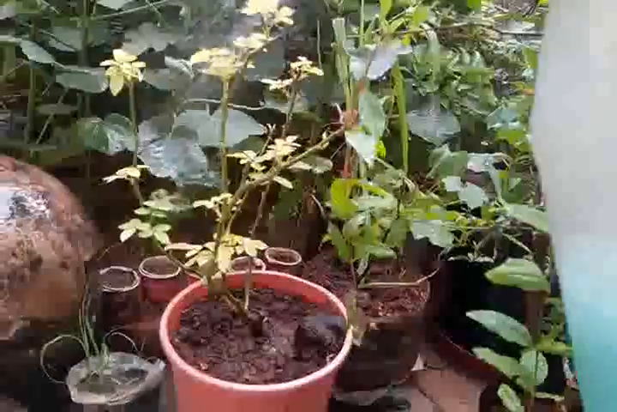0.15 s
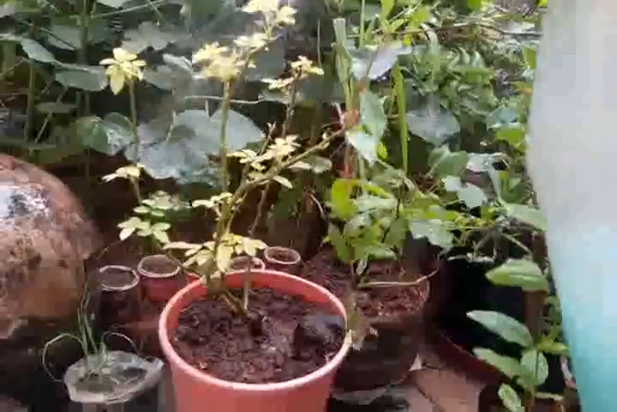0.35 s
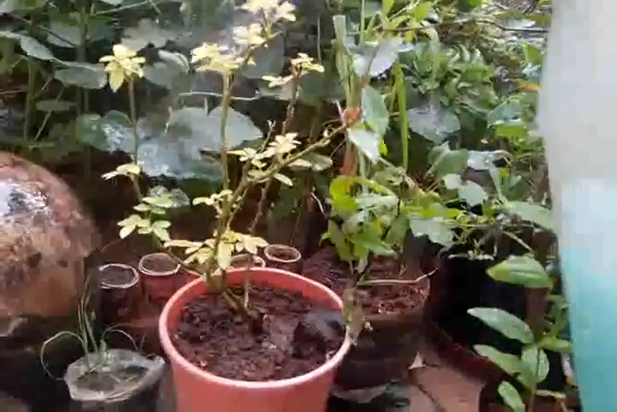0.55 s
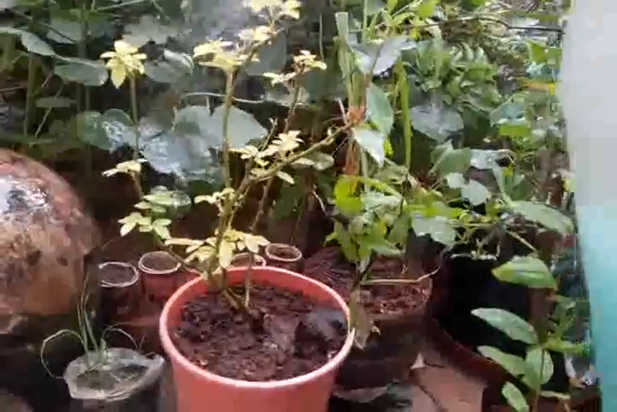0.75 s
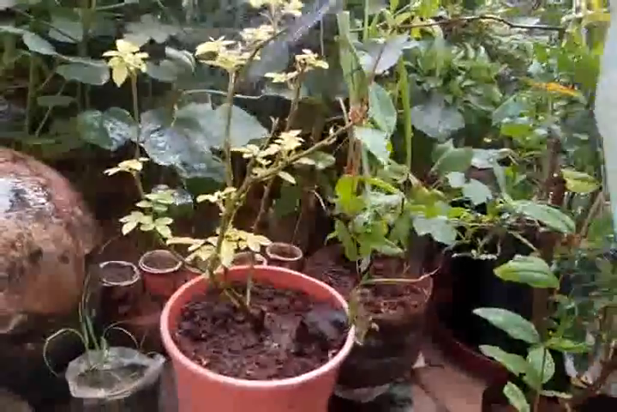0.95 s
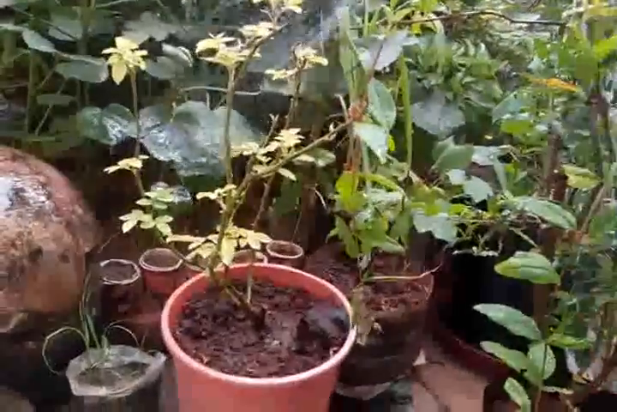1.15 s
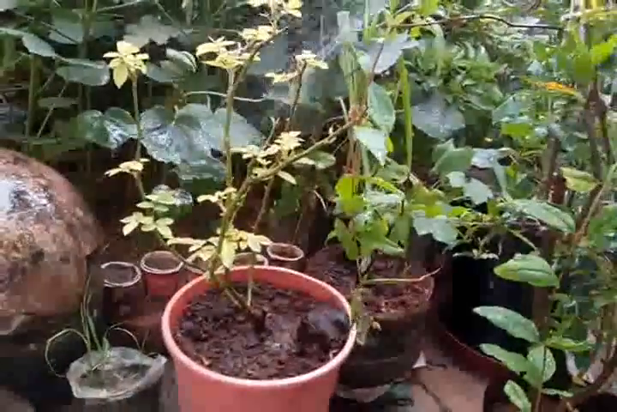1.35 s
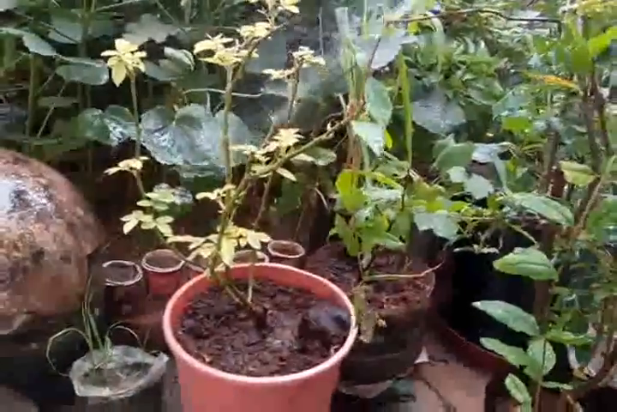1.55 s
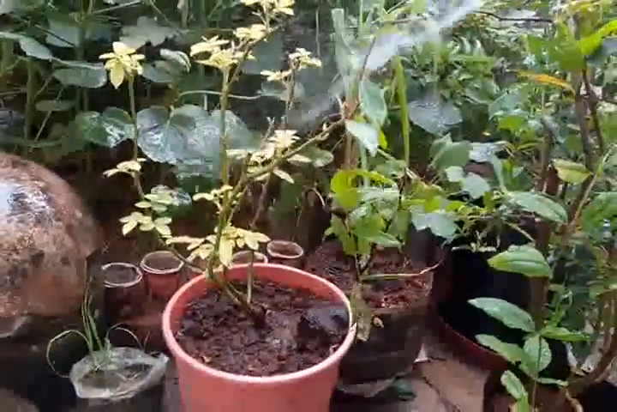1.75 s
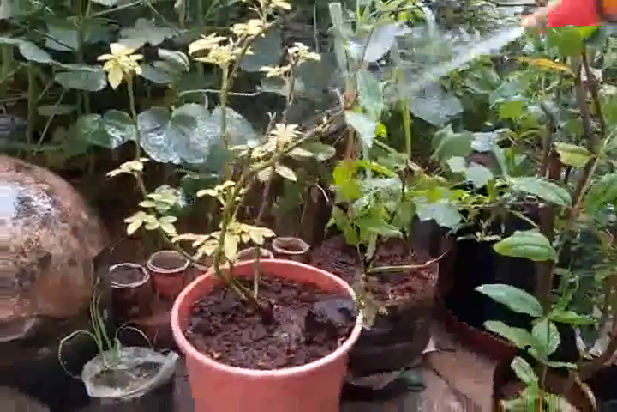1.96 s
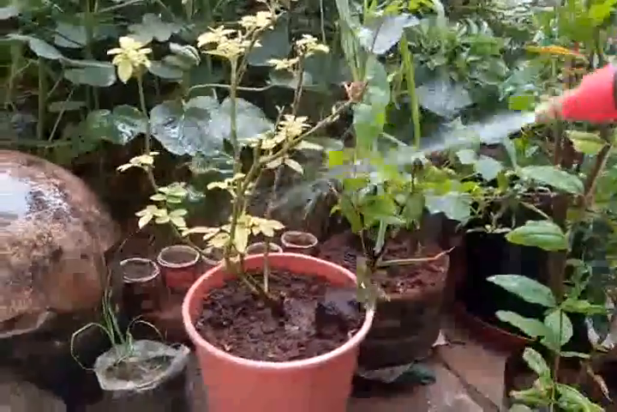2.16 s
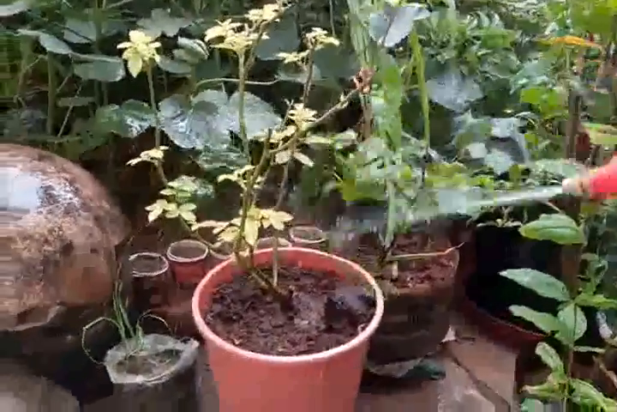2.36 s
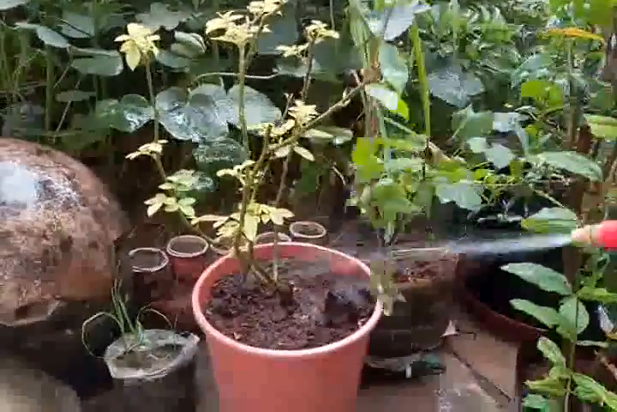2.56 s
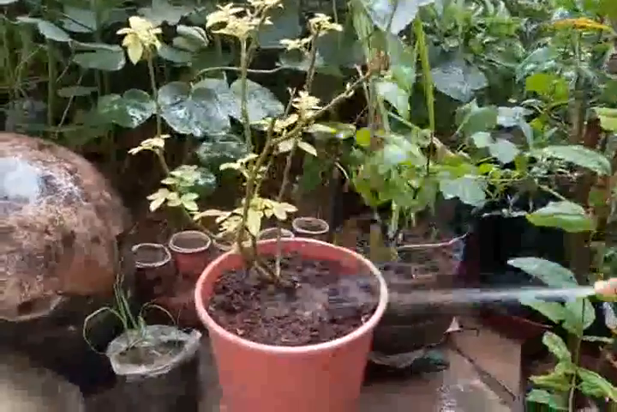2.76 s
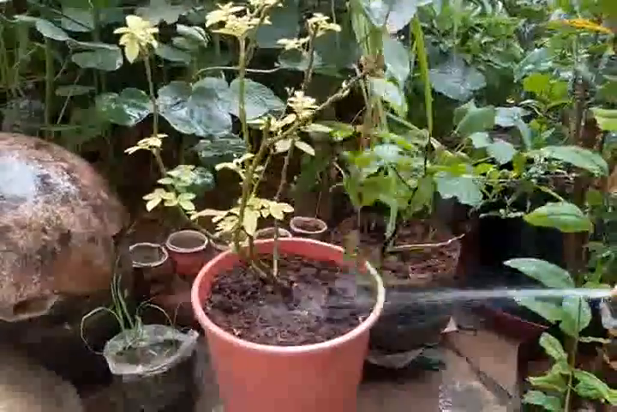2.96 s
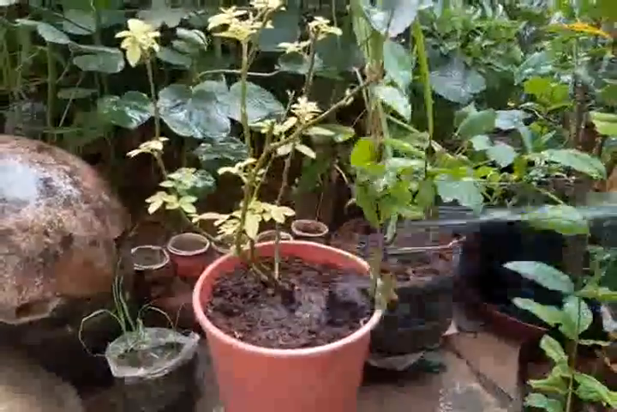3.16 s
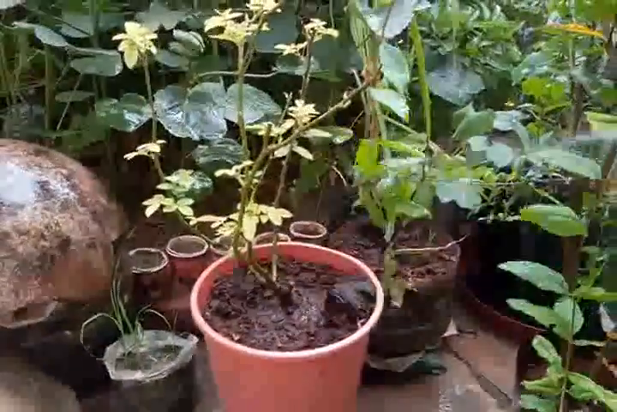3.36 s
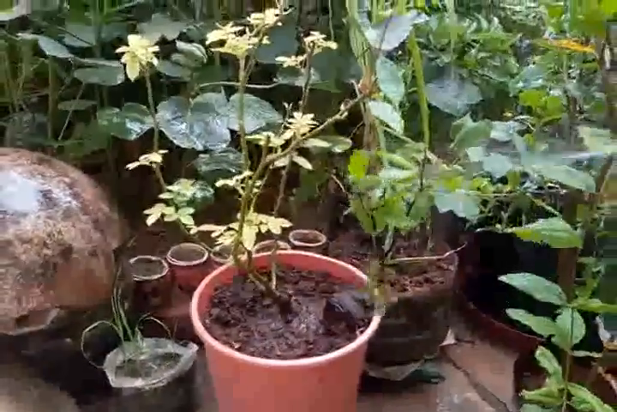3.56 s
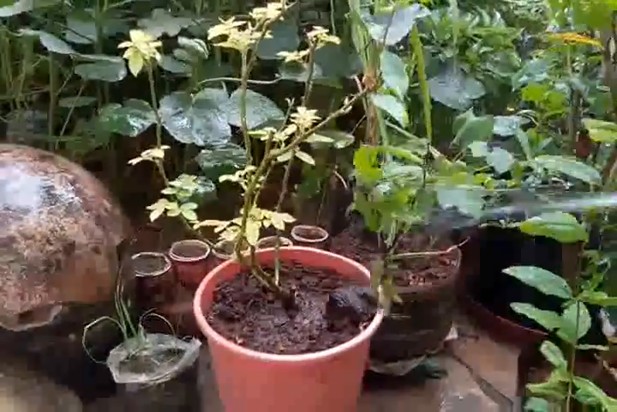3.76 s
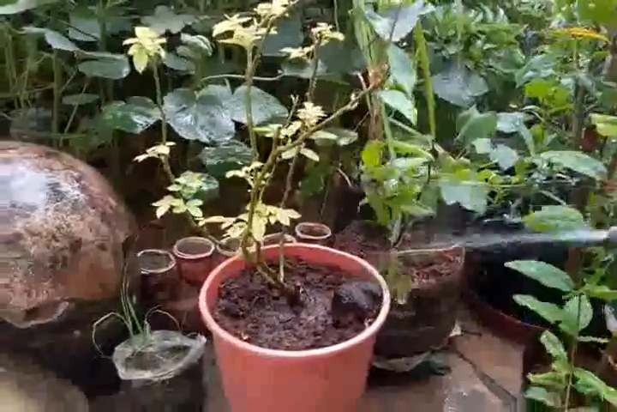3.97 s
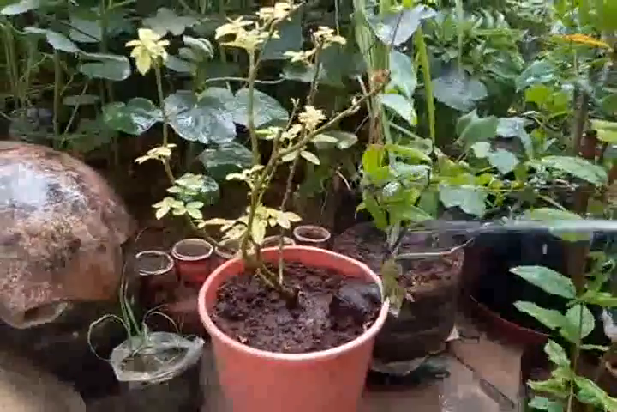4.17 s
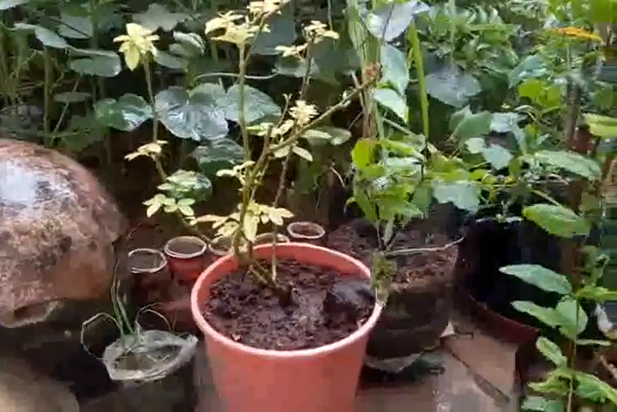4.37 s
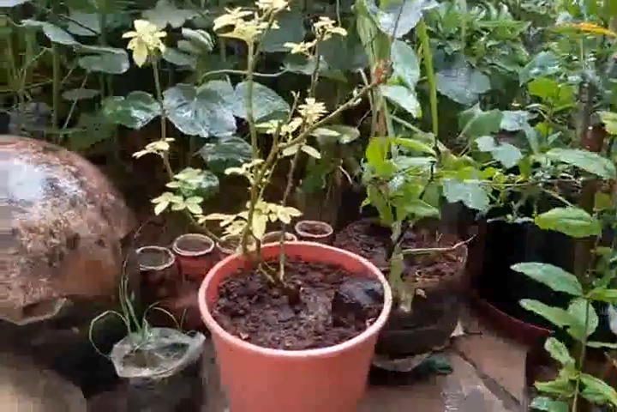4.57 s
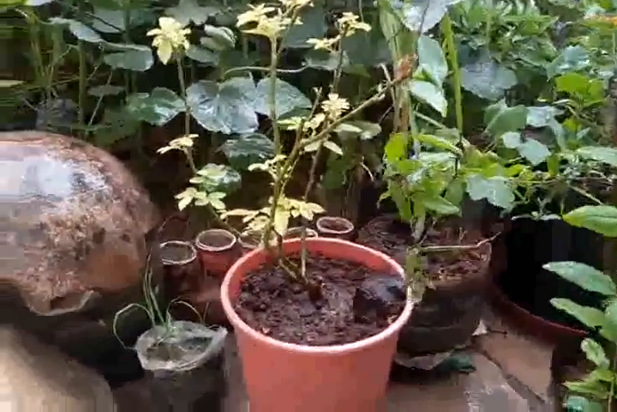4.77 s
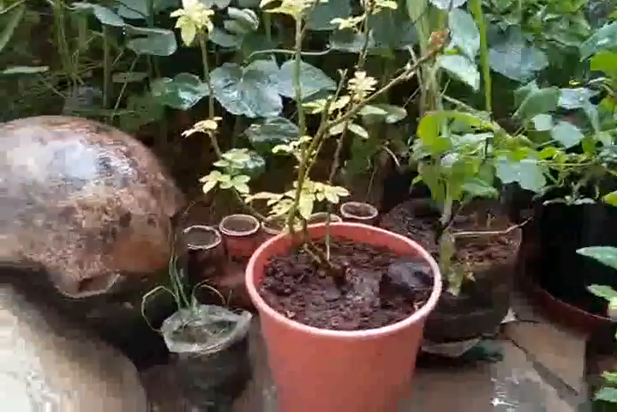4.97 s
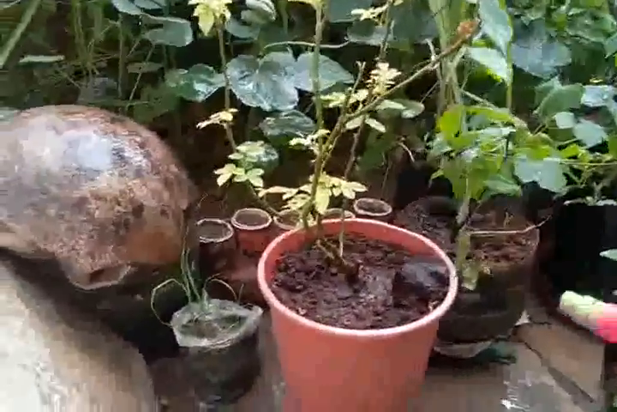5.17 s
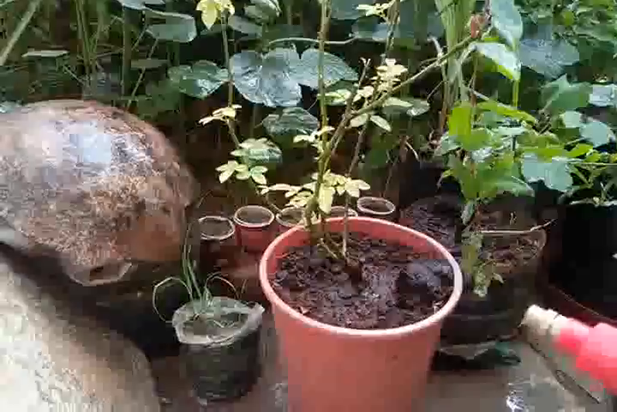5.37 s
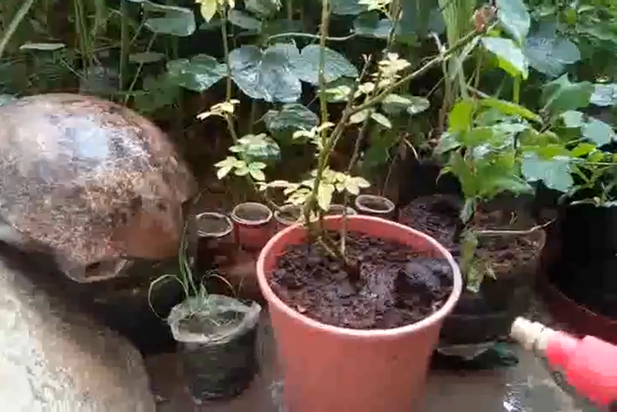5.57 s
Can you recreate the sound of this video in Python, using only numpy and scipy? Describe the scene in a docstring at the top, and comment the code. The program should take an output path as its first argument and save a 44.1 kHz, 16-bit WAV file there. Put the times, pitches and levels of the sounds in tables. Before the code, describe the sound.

A pressurised hand sprayer hisses close by from the start, a bright, fizzing mist over soft garden air and a faint, distant idling engine. For the first two seconds droplets patter on leaves in uneven swells, with bigger drops ticking and slapping. Soft dull thumps and small plops in wet soil come and go. From about 2.2 seconds the jet fizzes into the soil in short spurts and briefly rattles across a plastic pot near 2.4. Between 3.3 and 3.9 seconds it drums lightly on a hollow planter as the hiss swells again. At about 4.2 seconds the valve closes and the spray dies quickly, leaving a few weak dribbles and drips. From 5.1 to 5.5 seconds the hollow plastic sprayer knocks, clicks and rubs in the hand, most clearly around 5.4.

```python
"""A pressurised hand sprayer waters potted plants close by, over soft garden air and a far idling engine.
The jet hisses from the start; its droplets patter on leaves, big drops tick and slap, wet soil plops,
and dull thumps come and go. Past 2 s the jet fizzes into the soil and rattles across a plastic pot;
past 3 s it drums on a hollow planter. The valve closes at 4.2 s and the nozzle dribbles.
Last, after 5 s, the sprayer knocks, clicks and rubs in the hand."""
import sys
import numpy as np
from scipy import signal
from scipy.fft import rfft, irfft, next_fast_len
from scipy.io import wavfile
from scipy.ndimage import uniform_filter1d

SR = 44100
rng = np.random.default_rng(int(sys.argv[2]) if len(sys.argv) > 2 else 0)


def generate_wav(signal):
    """Clip the signal to [-1, 1] and save it as 16-bit WAV at the path in sys.argv[1]."""
    frames = np.transpose(np.atleast_2d(signal))
    scaled = np.clip(frames, -1, 1) * 32767
    pcm = np.round(scaled).astype(np.int16)
    wavfile.write(sys.argv[1], SR, pcm)


N = 248283
TIME = np.arange(N) / SR

# Table levels balance events within a layer, ahead of its gain and EQ. pan_db is left minus right.
# the bed of garden air: frequency_hz, level_db
GARDEN_EQ = [(15, -38), (28, -15), (99, -2), (335, -14.5), (451, -16.5), (659, -13.5), (754, -16),
             (1100, -25.5), (1650, -21.5), (2160, -26), (2840, -28.5), (3160, -26), (6050, -29),
             (10500, -25.5), (12200, -31), (14800, -36), (16000, -63)]
# the far engine's hum: multiple_of_firing_rate, level_db
ENGINE_HARMONICS = [(5, -80), (7, -58), (8, -59.5), (9, -60.5), (10, -70), (15, -68.5), (18, -71),
                    (21, -74)]
# the engine recedes: time_s, level_db
ENGINE_FADE = [(0, 2), (2.6, 2), (3.3, -1), (4.5, -1.5)]

# the steady jet, aimed high into the foliage, then down at the soil: time_s, hiss_db, stray_patter_db
JET_LEVELS = [(0, -44, -49.5), (0.6, -44.5, -51), (0.85, -45.5, -52), (1.22, -47, -54.5),
              (1.45, -43.5, -47), (1.75, -42.5, -48.5), (2.0, -38, -45), (2.2, -41.5, -67), (2.7, -42, -61),
              (3.1, -41.5, -63), (3.25, -48.5, -61), (3.36, -43, -56), (3.65, -38, -51.5),
              (3.88, -42.5, -53.5), (4.03, -44.5, -65), (4.2, -47.5, -61.5)]
# the bright mist: frequency_hz, level_db
HISS_EQ = [(1500, -28), (3000, -14.5), (5000, -29), (6500, -9), (8000, -2), (9200, 3), (10400, 6),
           (11100, 0), (11900, -9.5), (13500, -11), (15200, -17), (16000, -68)]
# spatter flying back from the plants: frequency_hz, level_db
SPLASH_EQ = [(2500, -21.5), (4000, -3), (5500, -2), (7000, -3.5), (10000, -6), (13000, -36)]
# droplets landing: frequency_hz, level_db
PATTER_EQ = [(400, -5), (700, -19.5), (900, -3), (1100, -6.5), (1700, 1), (2300, 2.5), (3100, -1.5),
             (4300, -10), (6000, -8.5), (9000, -33)]
# the ring of the foliage: pitch_hz, width_hz, level_db
LEAF_MODES = [(1084, 60, -6), (1235, 26, 0), (1546, 83, -3.5), (1874, 66, 1.5), (2270, 104, -1),
              (2610, 106, -3.5), (3050, 94, 4), (3903, 105, 2)]
# the low ring of broad surfaces: pitch_hz, width_hz, level_db
BROAD_MODES = [(180, 26, -2.4), (273, 97, -0.81), (341, 58, -1.4), (431, 36, 0.39), (525, 100, 1.1),
               (765, 29, 3), (947, 49, -1.8)]
# the jet sweeps across a plant: start_s, length_s, patter_db, splash_db
PLANT_SWEEPS = [(0.206, 0.27, -44.5, -46), (0.915, 0.15, -46.5, -45), (1.477, 0.1, -46.5, -50),
                (1.863, 0.21, -49.5, -46.5), (2.118, 0.15, -60, -45.5), (2.338, 0.13, -44, -46),
                (2.545, 0.074, -51.5, -69), (2.772, 0.039, -57.5, -60), (2.984, 0.02, -70, -51),
                (3.165, 0.037, -55, -55.5), (3.277, 0.018, -57, -48.5), (3.4, 0.015, -66, -52),
                (3.508, 0.079, -50, -74), (3.691, 0.04, -44.5, -68), (3.768, 0.053, -49, -55),
                (3.911, 0.029, -55, -49), (4.16, 0.017, -72, -58.5), (4.261, 0.04, -57, -74)]
# the jet lingers on one leaf: centre_s, half_length_s, pitch_hz, level_db, pan_db
LEAF_PASSES = [(0.342, 0.32, 1440, -43.5, 3), (0.452, 0.08, 650, -45.5, -4), (0.992, 0.12, 1180, -41, 3),
               (1.015, 0.14, 1750, -48.5, 12), (1.568, 0.31, 1184, -44.5, 2), (1.6, 0.19, 690, -59, 0),
               (1.753, 0.26, 3130, -48, 1), (1.935, 0.17, 1050, -42, -1), (1.998, 0.12, 795, -51, -2),
               (3.434, 0.025, 2670, -43, 6), (3.593, 0.047, 2310, -40, 4), (3.643, 0.22, 1193, -47, -1)]
# heavy drops slap a leaf: time_s, level_db, pitch_hz
LEAF_SLAPS = [(0.229, -38, 3870), (0.267, -40, 2530), (0.353, -37.5, 1530), (0.371, -41.5, 3000),
              (0.41, -41, 1610), (0.426, -36.5, 1580), (0.465, -38, 1300), (0.855, -41.5, 2400),
              (0.934, -45, 1230), (1.032, -41, 1910), (1.505, -44, 2300), (1.904, -40.5, 3120),
              (1.997, -47, 3020), (2.329, -37.5, 2780), (2.364, -53, 3070), (2.3815, -33, 7700),
              (2.434, -34.5, 2780), (2.466, -35, 2980), (2.589, -46, 2860), (2.82, -56, 4300),
              (3.007, -48, 1150), (3.007, -55, 4340), (3.168, -51, 2720), (3.189, -46.5, 3000),
              (3.417, -42, 1070), (3.532, -41, 1560), (3.607, -40, 2320), (3.716, -42, 1120),
              (3.728, -39, 1490), (3.767, -39.5, 1160), (3.785, -52, 2300), (3.847, -52, 1150),
              (4.195, -46, 4030), (4.28, -48.5, 1070), (4.289, -50, 1010), (4.928, -51.5, 870)]
# the biggest drops tick: time_s, level_db, pitch_hz, pan_db
DROP_TICKS = [(0.237, -32.5, 10000, 5), (0.454, -38.5, 9800, 6), (0.781, -40.5, 11200, 1),
              (0.9736, -32, 10500, 4), (1.2372, -39.5, 10600, -1), (1.291, -40.5, 10000, -5),
              (1.5115, -37.5, 9700, -3), (1.9764, -32.5, 10600, -4), (2.107, -39, 10000, -2),
              (2.1803, -37.5, 8700, 5), (2.26, -36.5, 10200, -7), (2.358, -47, 9990, -1),
              (2.3812, -32, 10000, 2), (2.724, -37.5, 10800, -4), (2.7754, -34, 9100, 1),
              (2.819, -36, 9150, -1), (2.9463, -40.5, 9800, -4), (2.9965, -34.5, 9200, 0),
              (3.028, -37.5, 9700, 4), (3.151, -41.5, 8200, 13), (3.5843, -45, 10000, -3),
              (3.6499, -29.5, 8700, 3), (3.9467, -40.5, 9900, -4), (4.0183, -38, 11000, -2),
              (4.195, -39, 10600, 6), (4.2645, -51, 10200, 4), (4.8888, -61.5, 10500, -9),
              (5.006, -52.5, 10200, -20)]
# the sparkle of those ticks: frequency_hz, level_db
TICK_EQ = [(1000, -35), (5000, -5.5), (9000, 2.5), (10700, 7), (11900, -6.5), (16000, -11)]
# soft low thumps: time_s, level_db, pitch_hz
THUMPS = [(0.31, -50, 150), (0.76, -55, 160), (1.27, -53, 149.5), (2.05, -52, 140), (2.221, -49, 110),
          (2.51, -51, 170), (2.85, -50, 140), (4.025, -53, 110)]
# water plops on wet soil: time_s, level_db, pitch_hz, pan_db
SOIL_PLOPS = [(0.47, -60, 433, -7), (1.442, -59, 490, -6), (1.903, -52.5, 410, -12),
              (2.034, -43.5, 376.6, -16), (2.67, -56, 439, -14), (2.896, -60, 500.4, -4.5),
              (3.454, -57, 295, -4), (3.674, -50, 417, -6), (3.715, -47.5, 379, -7), (3.764, -55, 409, -5),
              (4.655, -57, 674, -6)]
# the jet digs into wet soil and fizzes: start_s, length_s, level_db
SOIL_FIZZES = [(2.225, 0.029, -38), (2.58, 0.044, -40), (2.79, 0.055, -38.5), (2.97, 0.049, -41.5),
               (3.135, 0.053, -41.5), (4.07, 0.073, -43.5)]
# the plastic pot's wall: pitch_hz, width_hz, level_db
POT_MODES = [(1140, 230, -4), (1890, 110, -4), (2120, 260, -1), (2850, 230, 4), (3090, 260, 5.5),
             (3850, 220, -13)]
# the jet hits the planter's side: start_s, length_s, level_db
PLANTER_HITS = [(3.29, 0.04, -63), (3.411, 0.04, -53), (3.54, 0.078, -58), (3.662, 0.023, -57),
                (3.71, 0.026, -46), (3.752, 0.034, -49.5), (3.835, 0.023, -58)]
# the planter's hollow wall: pitch_hz, width_hz, level_db
PLANTER_MODES = [(181, 87, 1), (286, 55, 1.5), (377, 47, 2), (590, 210, 2.5), (794, 53, 7),
                 (1070, 210, 6.5)]
# the nozzle swings right once it is shut: time_s, pan_db
NOZZLE_PAN = [(0, -1), (4.37, -1.5), (4.52, -7.5), (5.0, -4.5)]
# the shut nozzle dribbles: start_s, length_s, level_db
DRIBBLES = [(4.463, 0.068, -54), (4.6, 0.1, -65), (4.917, 0.0091, -53.5), (4.96, 0.061, -61.5),
            (5.235, 0.054, -63)]

# the sprayer knocks in the hand: time_s, level_db, pan_db
KNOCKS = [(5.131, -46, -5), (5.364, -43, 2), (5.377, -39, 0), (5.387, -34.5, -0.5), (5.401, -42.5, 0),
          (5.482, -53, -10), (5.501, -50.5, -2), (5.517, -49.5, -8)]
# its hollow plastic body: pitch_hz, width_hz, level_db
SPRAYER_MODES = [(189, 79, -0.5), (364, 49, 1), (586, 180, -4), (795, 44, 5), (1046, 60, 5),
                 (1310, 170, -7.5), (1450, 97, -2.5), (2300, 330, -10), (3580, 890, -13.5)]
# the trigger clicks: time_s, level_db
TRIGGER_CLICKS = [(5.275, -53), (5.362, -55.5), (5.376, -54.5), (5.393, -60), (5.468, -61.5)]
# the tone of those clicks: frequency_hz, level_db
CLICK_EQ = [(400, 6), (1000, 4), (2300, -1), (3200, -4), (5000, 6), (7500, 7), (10000, 7.5), (12000, -4),
            (16000, -43)]
# the hand rubs over the sprayer: start_s, length_s, level_db
GRIP_RUBS = [(5.36, 0.056, -45), (5.42, 0.063, -58.5), (5.475, 0.074, -59)]

# nearby leaves and pots reflect the spray: delay_s, level_db
REFLECTIONS = [(.0007, -20.5), (.0017, -10.5), (.0031, -9.5), (.0058, -10.5)]
# stereo image at the two microphone ports, bass in opposite phase: frequency_hz, correlation
SURROUND_IMAGE = [(30, -0.59), (80, -0.69), (200, -1), (400, -0.33), (750, -0.43), (1400, 0.3),
                  (3200, -0.0068), (5000, 0.065), (12000, 0.015), (15000, 0.51)]
# stereo image of the spray: frequency_hz, correlation
SPRAY_IMAGE = [(250, 0.67), (600, 0.87), (1200, 0.33), (2200, 0.22), (3500, 0.47), (5000, 0.057),
               (8000, 0.025), (15000, 0.059)]
# the spray's phase between the ports: frequency_hz, left_lead_rad
SPRAY_PHASE = [(260, 3.1), (780, 3.57), (1150, 4.36), (1720, 5.32), (2150, 4.93), (3010, 5.1), (3700, 6.94),
               (6550, 8.08)]
# the wet spot shifts in the image: time_s, right_lead_s
SPOT_LEAD = [(3.1, 0.00037), (3.35, .00013), (3.6, 0.000076), (4.0, 0.00014)]
# hollows of the microphone housing: pitch_hz, width_hz, gain_db
HOUSING_MODES = [(603, 310, -4.5), (1022, 157, 3)]

FIRING_HZ = 11.545
VALVE_CLOSES_S, PRESSURE_FALL_DB_PER_S = 4.235, 119
PRE_ROLL_S = .012   # room for a burst's attack


def from_db(db):
    """Decibels to gain."""
    return 10 ** (np.asarray(db) / 20)


def rms_one(x):
    """Scale to unit power."""
    return x / np.sqrt(np.mean(x ** 2) + 1e-20)


def together(*gains):
    """Joint gain of unrelated sounds: their powers add."""
    return np.sqrt(sum(gain ** 2 for gain in gains))


def panned(pan_db):
    """Left and right gains, fixed or moving."""
    return from_db(pan_db * np.array([[.5], [-.5]]))


def automation(points):
    """A curve over time, read at every sample."""
    return np.interp(TIME, *np.transpose(points))


def per_bin(points):
    """A curve over log frequency, read at every bin of a double-length transform."""
    hz, value = np.transpose(points)
    return np.interp(np.log(np.linspace(1, SR / 2, next_fast_len(N) + 1)), np.log(hz), value)


def shaped(x, gain):
    """Apply a gain per frequency bin."""
    return irfft(rfft(x, 2 * next_fast_len(N)) * gain)[..., :N]


def equalised(x, eq):
    """Colour a sound with an EQ curve."""
    return shaped(x, from_db(per_bin(eq)))


def lowpass(x, hz):
    """A gentle treble roll-off."""
    return signal.sosfilt(signal.butter(2, hz, fs=SR, output="sos"), x)


def delayed(x, delay_s):
    """A moving delay, in whole samples."""
    return np.interp(np.arange(N) - np.round(SR * delay_s), np.arange(N), x)


def drift(rate_hz):
    """Smooth random modulation with a spread of one."""
    hop, warm_up = 40, 2000
    pole = np.exp(-2 * np.pi * hop * rate_hz / SR)
    noise = rng.standard_normal(N // hop + warm_up + 2)
    slow = signal.lfilter([1], [1, -2 * pole, pole * pole], noise)[warm_up:]
    return np.interp(np.arange(N) / hop, np.arange(len(slow)), rms_one(slow))


def resonate(x, hz, width_hz):
    """A resonance with a gain of one at its top."""
    r = np.exp(-np.pi * width_hz / SR)
    feedback = [1, -2 * r * np.cos(2 * np.pi * hz / SR), r * r]
    return signal.lfilter(np.array([1, 0, -1]) * (1 - r * r) / 2, feedback, x + 1e-18)


def gliding(x, hz, width_hz):
    """A resonance whose pitch moves."""
    carrier = np.exp(2j * np.pi * np.cumsum(hz) / SR)
    r = np.exp(-np.pi * width_hz / SR)
    return 2 * np.real(carrier * signal.lfilter([1 - r], [1, -r], x / carrier + 1e-18))


def ring_body(x, modes):
    """Ring a stiff body's modes in alternating polarity."""
    return sum((-1) ** k * from_db(db) * resonate(x, hz, width)
               for k, (hz, width, db) in enumerate(modes))


def swells(rows, attack_s, release_s):
    """Attack, hold and release envelope for rows of start_s, length_s, level_db."""
    return together(*(from_db(db) * np.clip((TIME - start) / attack_s, 0, 1)
                      * np.exp(-np.maximum(TIME - start - length, 0) / release_s)
                      for start, length, db in rows))


def impacts(per_s, spread_db, clump_db):
    """Random impulses of uneven size, in clumps, each with its own lag and polarity at the ports."""
    at = np.flatnonzero(rng.random(N) < per_s / SR)
    size = from_db(spread_db * np.minimum(rng.exponential(1, N), 4.5) + clump_db * drift(18.5))[at]
    lag = rng.integers(0, 14, N)[at] - 7
    polarity = rng.choice([-1, 1], (2, N))[:, at]
    out = np.zeros((2, N))
    out[0, at], out[1, (at + lag) % N] = size * polarity
    return rms_one(out)


def droplets(eq, per_s, spread_db, clump_db):
    """A shower of tiny impacts, coloured by an EQ."""
    return rms_one(equalised(impacts(per_s, spread_db, clump_db), eq))


def sprayed(modes, per_s, spread_db, clump_db, wander_db, pitch_wander):
    """Droplets ring each mode; its level and pitch shift as the jet wanders over the surface."""
    out = 0
    for hz, width, db in modes:
        gain = from_db(db + wander_db * np.tanh(drift(11.5)))
        hits = impacts(per_s, spread_db, clump_db)
        pitch_hz = hz * np.exp(pitch_wander * drift(3.06))
        out += gain * gliding(hits, pitch_hz, width)
    return rms_one(out)


def burst(rise_s, decay_s, tail_db, tail_s):
    """A rough contact builds and dies, with a tail of scatter from the surroundings."""
    age = np.arange(6000) / SR - PRE_ROLL_S - .001
    after = np.maximum(age, 0)
    attack = np.exp(np.minimum(age, 0) / rise_s)
    decay = np.exp(-after / decay_s) + from_db(tail_db) * np.exp(-after / tail_s)
    return rng.choice([-1., 1.], (2, len(age))) * attack * decay


def place(out, time_s, db, sound):
    """Mix in a burst, its loudest two milliseconds at the given level."""
    start = int(max(time_s - PRE_ROLL_S, 0) * SR)
    loudest = np.sqrt(uniform_filter1d(np.mean(sound ** 2, axis=0), 88).max())
    slot = out[:, start:start + sound.shape[1]]
    slot += (sound * from_db(db) / loudest)[:, :slot.shape[1]]


def at_ports(pair, image=SURROUND_IMAGE):
    """Blend two unrelated signals, mid and side, into what the two microphone ports hear."""
    correlation = np.clip(per_bin(image), -.98, .98)
    mid = shaped(pair[0] + pair[1], np.sqrt(1 + correlation))
    side = shaped(pair[0] - pair[1], np.sqrt(1 - correlation))
    return np.array([mid + side, mid - side]) / 2


def garden_air():
    """A soft, steady bed of outdoor noise."""
    return from_db(-62) * rms_one(equalised(rng.standard_normal((2, N)), GARDEN_EQ))


def far_engine():
    """Harmonics of a slow firing rate throb over a rumble, in nearly opposite phase at the ports."""
    firings = FIRING_HZ * (TIME - .048) + .012 * drift(1.5)
    port_phase = np.array([[0], [np.pi - .4]])
    hum = 0
    for multiple, db in ENGINE_HARMONICS:   # each arrives by its own echoes, which smears the throb
        gain = from_db(db + drift(0.53))
        hum += gain * np.cos(2 * np.pi * round(multiple) * firings + .5 * drift(0.19) + port_phase)
    rumble = rms_one(resonate(resonate(rng.standard_normal(N), 125, 110), 125, 200))
    throb = from_db(3.5 * np.cos(2 * np.pi * firings) + 4.5 * np.tanh(drift(10)))
    waver = from_db(automation(ENGINE_FADE) + 6.5 * np.tanh(drift(rate_hz=4.9)))
    return waver * (from_db(-1) * hum + from_db(-65.5) * rumble * throb * np.array([[.9], [-1.1]]))


def spray_envelopes():
    """Hiss, splash and patter gains: the jet and what it sweeps, then dribbles after the valve shuts."""
    times, hiss_db, stray_db = np.transpose(JET_LEVELS)
    pressure_db = -PRESSURE_FALL_DB_PER_S * np.maximum(TIME - VALVE_CLOSES_S, 0)
    steady = from_db(np.interp(TIME, times, hiss_db) + pressure_db)
    stray = from_db(np.interp(TIME, times, stray_db) + pressure_db)
    starts, lengths, patter_db, splash_db = np.transpose(PLANT_SWEEPS)
    plant_patter = swells(zip(starts, lengths, patter_db), attack_s=.02, release_s=.052)
    plant_splash = swells(zip(starts, lengths, splash_db), attack_s=.02, release_s=.052)
    soil_fizz = swells(SOIL_FIZZES, attack_s=.01, release_s=.0088)
    dribble = swells(DRIBBLES, attack_s=.0026, release_s=.032)
    nozzle = together(steady, soil_fizz, dribble)
    hiss = together(nozzle, from_db(3) * plant_splash)   # a splash throws up fizz of its own
    splash = together(from_db(-18) * nozzle, from_db(-2.5) * stray, plant_splash)
    patter = together(stray, plant_patter, from_db(-7) * dribble)
    return hiss, splash, patter


def jet_hiss(envelope):
    """The water tears into a fizzing mist with sparser spits."""
    mist = droplets(HISS_EQ, per_s=14000, spread_db=4, clump_db=2)
    spits = droplets(HISS_EQ, per_s=320, spread_db=3.8, clump_db=2)
    return envelope * (from_db(-2) * mist + from_db(-9) * spits) * panned(automation(NOZZLE_PAN))


def back_splash(envelope):
    """Fine spatter and coarser drops fly back from the plants."""
    spatter = droplets(SPLASH_EQ, per_s=11000, spread_db=2.5, clump_db=1.78)
    coarse = droplets(SPLASH_EQ, per_s=980, spread_db=3.6, clump_db=5)
    return envelope * (from_db(0.37) * spatter + from_db(-7) * coarse) * panned(1.3)


def leaf_patter(envelope):
    """Droplets tap the foliage and set it ringing."""
    taps = droplets(PATTER_EQ, per_s=750, spread_db=2, clump_db=1.5)
    leaves = sprayed(LEAF_MODES, per_s=900, spread_db=1.8, clump_db=1.8, wander_db=4.5, pitch_wander=.04)
    return envelope * (from_db(-3.5) * taps + from_db(-4) * leaves) * panned(1)


def low_drumming(patter):
    """Broad surfaces drum low, in fits, loosely following the patter."""
    broad = sprayed(BROAD_MODES, per_s=200, spread_db=3.5, clump_db=3, wander_db=12, pitch_wander=.034)
    compressed = rms_one(patter) ** 0.28
    return from_db(-64.5) * compressed * at_ports(broad) * panned(-4.5)


def single_leaves(glide_per_s=0.18):
    """One leaf swells and fades under the passing jet, its pitch rising as the jet nears the stem."""
    out = 0
    for centre_s, half_s, hz, db, pan_db in LEAF_PASSES:
        pitch_hz = hz * np.exp(glide_per_s * np.clip(TIME - centre_s, -half_s, half_s))
        hits = impacts(per_s=700, spread_db=0, clump_db=3)
        ringing = rms_one(gliding(hits, pitch_hz, width_hz=45 + 0.052 * hz))
        swell = np.exp(-2 * ((TIME - centre_s) / half_s) ** 2)
        out += from_db(db) * swell * ringing * panned(pan_db)
    return from_db(-7) * out


def leaf_slaps():
    """Heavy drops smack a leaf, which damps quickly."""
    out = np.zeros((2, N))
    for time_s, db, hz in LEAF_SLAPS:
        splat = burst(rise_s=.0007, decay_s=.002, tail_db=-10, tail_s=.007)
        place(out, time_s, db, resonate(resonate(splat, hz, 0.5 * hz), hz, 1.5 * hz))
    return out


def drop_ticks():
    """Single big drops land with a tiny, bright snap."""
    out = np.zeros((2, N))
    for time_s, db, hz, pan_db in DROP_TICKS:
        snap = burst(rise_s=.00025, decay_s=.0008, tail_db=-16, tail_s=.005)
        place(out, time_s, db, resonate(snap, hz, width_hz=3000) * panned(pan_db))
    return from_db(4) * equalised(out, TICK_EQ)


def thumps():
    """Dull bumps ring for a cycle or two, in opposite phase left and right."""
    out = np.zeros((2, N))
    for time_s, db, hz in THUMPS:
        push = burst(rise_s=.003, decay_s=.008, tail_db=-12, tail_s=.02)[:1]
        place(out, time_s, db, resonate(resonate(push, hz, 70), hz, 130) * np.array([[1], [-1]]))
    return out


def soil_plops(rise_s=.0058, decay_s=.017):
    """A pocket of air in the wet soil swells into a short, round note."""
    out = np.zeros((2, N))
    port_phase = np.array([[0], [1.8]])
    for time_s, db, hz, pan_db in SOIL_PLOPS:
        age = TIME - time_s
        envelope = np.exp(np.minimum(age, 0) / rise_s - np.maximum(age, 0) / decay_s)
        note = np.sqrt(2) * np.sin(2 * np.pi * hz * age + 0.9 * drift(30) + port_phase)
        out += from_db(db) * envelope * note * rms_one(panned(pan_db))
    return out


def pot_rattle(start_s=2.315, length_s=0.16):
    """The jet crosses a plastic pot and its stiff wall rattles."""
    envelope = swells([(start_s, length_s, -42.5)], attack_s=.0088, release_s=.012)
    hits = impacts(per_s=1000, spread_db=-0.5, clump_db=0)
    return envelope * rms_one(ring_body(hits, POT_MODES)) * panned(1)


def planter_boom():
    """The hollow wall booms under the full jet."""
    force = swells(PLANTER_HITS, attack_s=.005, release_s=.012)
    wall = sprayed(PLANTER_MODES, per_s=1100, spread_db=-.5, clump_db=.5, wander_db=1, pitch_wander=.015)
    return force * at_ports(wall) * panned(-2)


def sprayer_knocks():
    """The hollow plastic body knocks in the hand; a softer touch lasts longer, so it sounds duller."""
    out = np.zeros((2, N))
    for time_s, db, pan_db in KNOCKS:
        contact = burst(rise_s=.0005, decay_s=.003, tail_db=-7, tail_s=.008)
        cutoff_hz = np.clip(3200 * from_db(0.36 * (db + 26.5)), 500, 12000)
        body = ring_body(lowpass(contact, cutoff_hz), SPRAYER_MODES)
        place(out, time_s, db, body * panned(pan_db))
    return from_db(2.5) * out


def trigger_clicks():
    """The trigger makes small, crisp contacts."""
    out = np.zeros((2, N))
    for time_s, db in TRIGGER_CLICKS:
        place(out, time_s, db, burst(rise_s=.002, decay_s=.0025, tail_db=-9, tail_s=.012))
    return from_db(8.5) * equalised(out, CLICK_EQ)


def grip_rubs():
    """The grip sticks and slips on the plastic and sets its body ringing."""
    slips = lowpass(impacts(per_s=1100, spread_db=2.5, clump_db=0.5), hz=1900)
    body = rms_one(ring_body(slips, SPRAYER_MODES))
    return swells(GRIP_RUBS, attack_s=.0056, release_s=.0074) * body * panned(1)


def reflected(spray, wander=.06):
    """Near reflections cut notches that slide as the nozzle moves, each port in its own way."""
    out, power = spray, 1
    for delay_s, db in REFLECTIONS:
        echo = [delayed(port, delay_s * (1 + wander * drift(rate_hz=1.2))) for port in spray]
        out = out + from_db(db) * np.array(echo)
        power += from_db(db) ** 2
    return out / np.sqrt(power)


def from_wet_spot(spray):
    """The spray comes from one spot: partly alike at the ports, offset in phase and by a moving lead."""
    left, right = at_ports(spray, SPRAY_IMAGE)
    right = shaped(right, np.exp(-1j * per_bin(SPRAY_PHASE)))
    return np.array([left, delayed(right, -automation(SPOT_LEAD))])


def scene():
    """The mix: spray and sprayer up front, the quiet garden and the engine behind."""
    hiss, splash, patter = spray_envelopes()
    spray = reflected(jet_hiss(hiss) + back_splash(splash) + leaf_patter(patter) + pot_rattle())
    bright_water = from_wet_spot(spray + single_leaves() + drop_ticks() + leaf_slaps())
    low_water = low_drumming(patter) + planter_boom() + soil_plops()
    handling = sprayer_knocks() + trigger_clicks() + grip_rubs()
    return bright_water + low_water + at_ports(handling + garden_air()) + far_engine() + thumps()


def record(dry):
    """The microphone housing colours the sound with its hollows; the top is cut steeply."""
    for hz, width, db in HOUSING_MODES:
        dry = dry + (from_db(db) - 1) * resonate(dry, hz, width)
    cutoff_hz = 15600
    return signal.sosfilt(signal.ellip(10, .2, 70, cutoff_hz, fs=SR, output="sos"), dry)


dry = scene()
out = record(dry)
generate_wav(out)
```